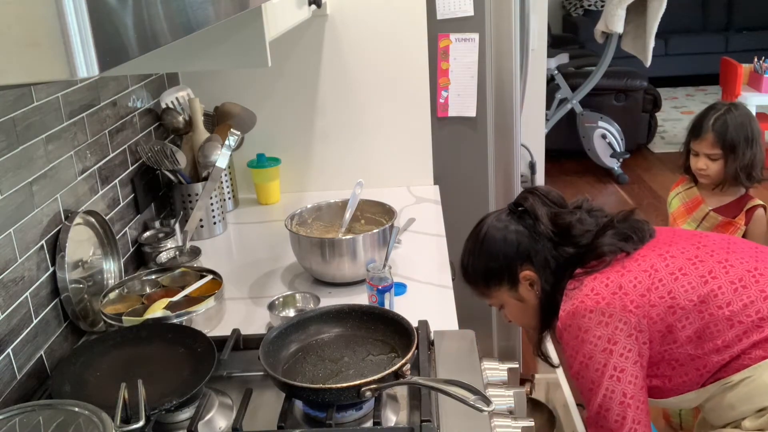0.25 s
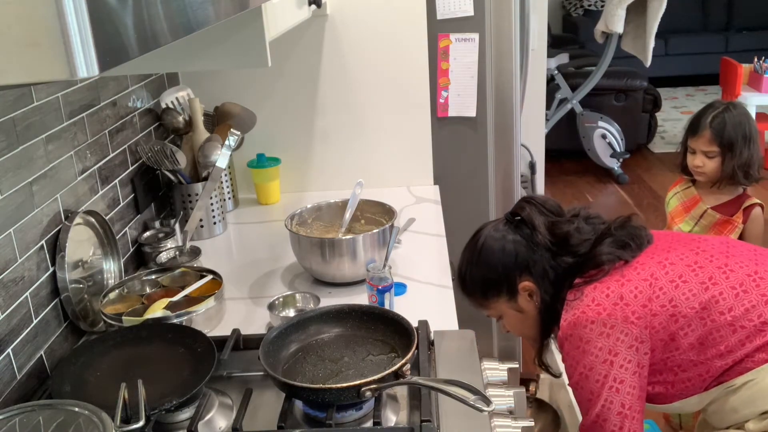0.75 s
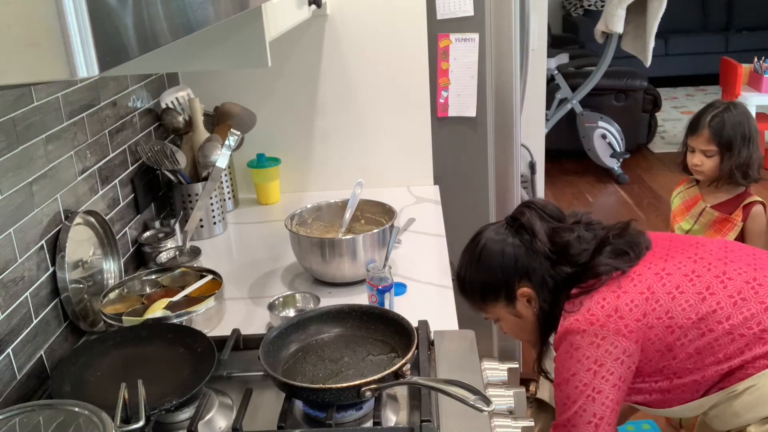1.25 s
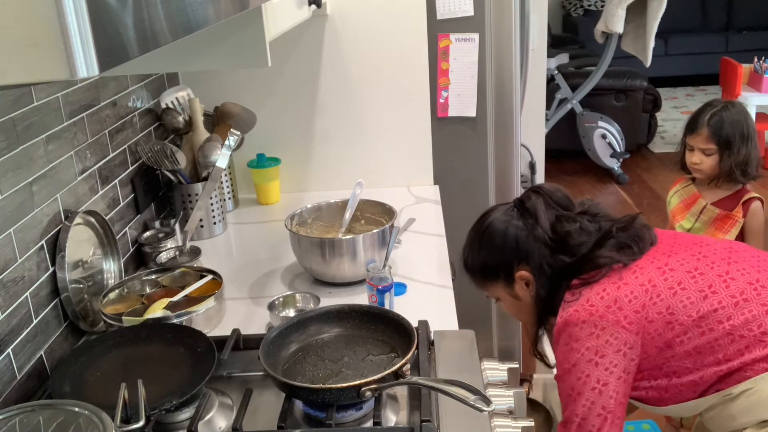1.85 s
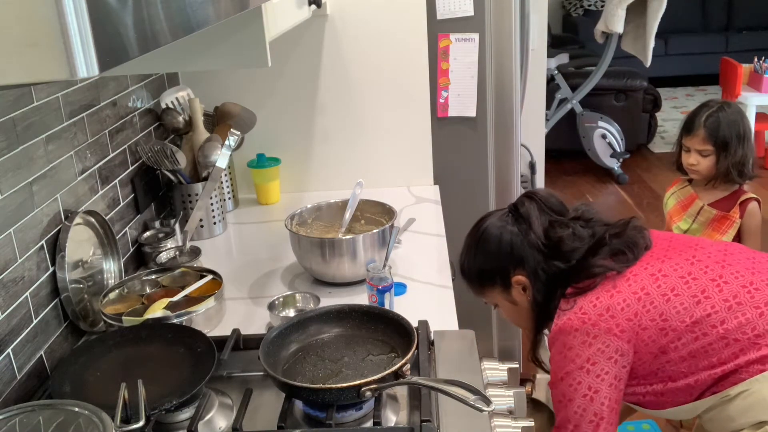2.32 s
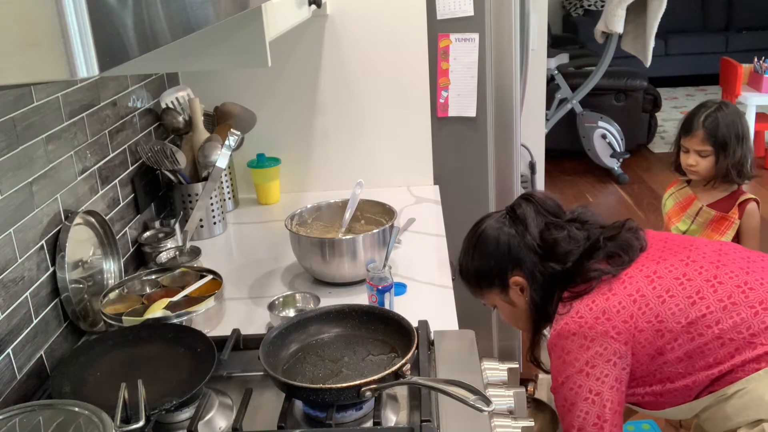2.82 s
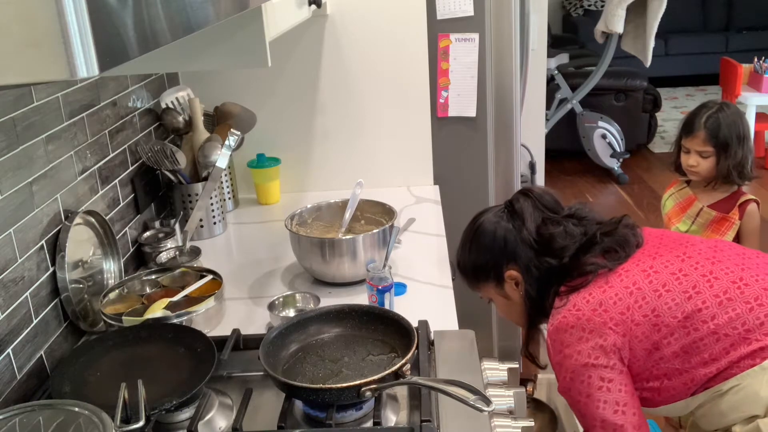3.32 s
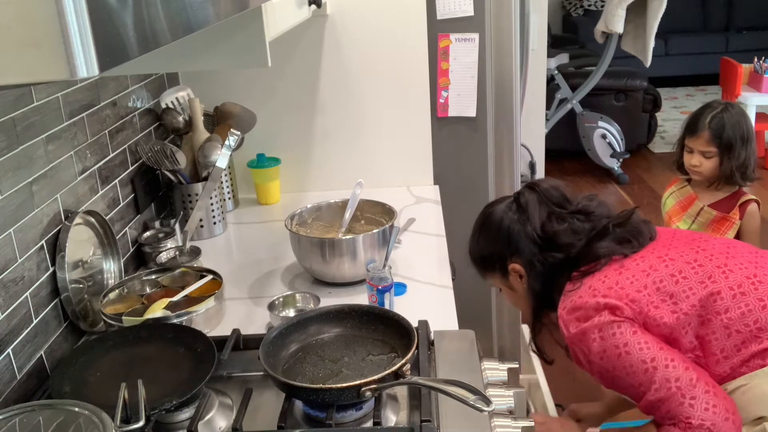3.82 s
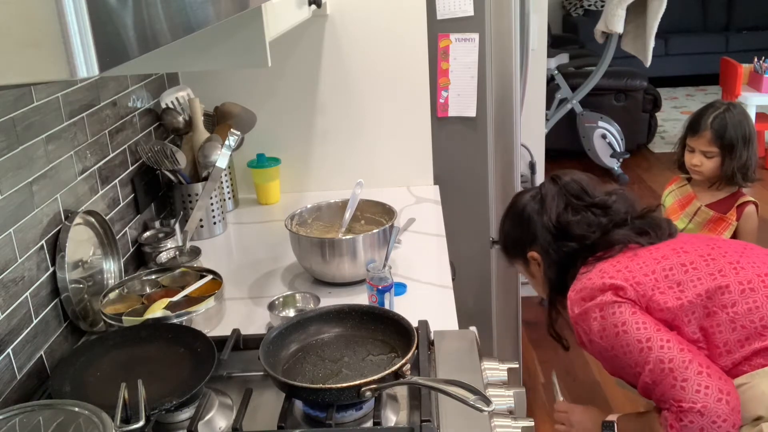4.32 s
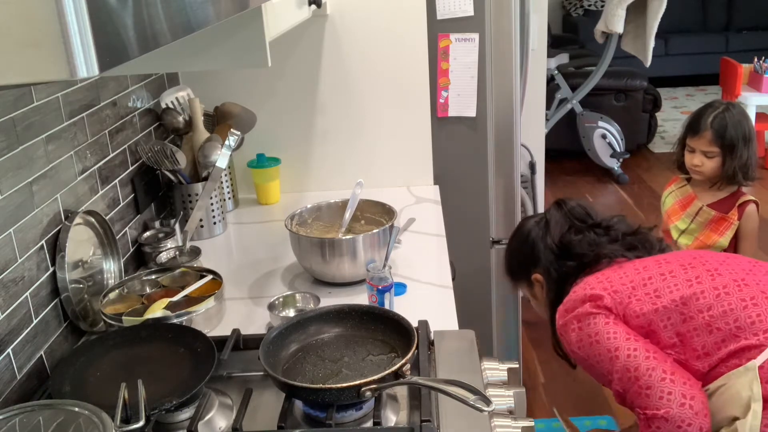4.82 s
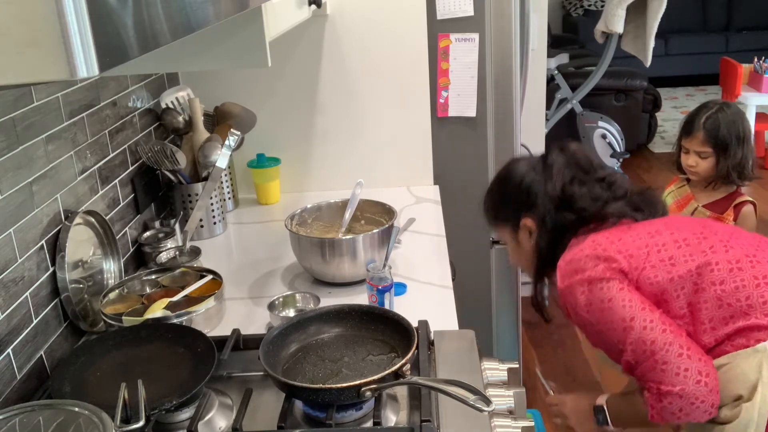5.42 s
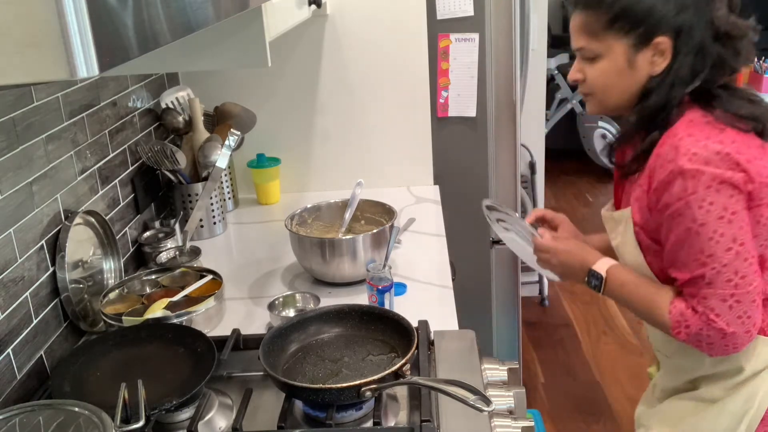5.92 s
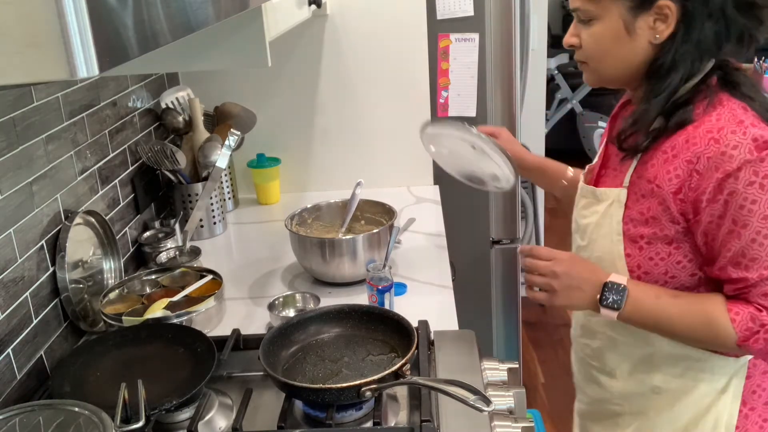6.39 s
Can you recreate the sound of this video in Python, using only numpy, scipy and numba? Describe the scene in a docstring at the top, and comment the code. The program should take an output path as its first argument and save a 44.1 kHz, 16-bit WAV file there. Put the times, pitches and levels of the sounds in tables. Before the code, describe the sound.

A low kitchen drawer bumps open with dull wooden knocks. Steel pans and lids clank, scrape and rattle as someone rummages, the heavier knocks booming in the drawer. After a short lull it rolls in with a judder and slams shut. A glass lid ticks and clothes rustle faintly. A fridge hums quietly in the hard, echoing room, heard from across the counter.

```python
"""Steel pans and lids clank, scrape and rattle as a low drawer is rummaged through in a tiled kitchen.
Each knock rings the modes of the metal and booms in the wooden drawer box. The drawer bumps open,
later rolls in with a stick-slip judder and slams; a glass lid ticks and the floor thuds softly.
A fridge hums and clothes rustle in the hard, echoing room, heard from across the counter."""
import sys
import numpy as np
from scipy import signal
from scipy.fft import rfft, irfft, next_fast_len
from scipy.io import wavfile
from scipy.ndimage import uniform_filter1d
from numba import njit

SR = 44100
rng = np.random.default_rng(int(sys.argv[2]) if len(sys.argv) > 2 else 0)


def log_audio(samples):
    """Write samples as a 16-bit WAV file to the path given in sys.argv[1]."""
    # one column per channel
    frames = np.atleast_2d(samples).T
    # limit to full scale, then quantise
    limited = np.clip(frames, -1, 1)
    pcm = np.round(limited * 32767).astype(np.int16)
    wavfile.write(sys.argv[1], SR, pcm)


N = 293441
T = np.arange(N) / SR

# modes of the pans, lids, drawer box and front panel: (frequency [Hz], level [dB], t60 [s])
PAN_MODES = [(657.5, 2, 0.038), (772, -2.5, 0.1), (845, 1.5, 0.075), (913, 0, 0.11), (990, -8, 0.014),
             (1096, -3.5, 0.05), (1168, -1, 0.088), (1277, -4, 0.11), (1390, -2, 0.066)]
LID_MODES = [(1500, -2, 0.099), (1575, -1.5, 0.11), (1685, -9.5, 0.27), (1779, -5, 0.053), (1833, 0.5, 0.1),
             (1921, -7, 0.076), (1996, 0, 0.072), (2090, -3.5, 0.11), (2340, -14, 0.027),
             (2512, -8.5, 0.13)]
BOX_MODES = [(175.6, -3, 0.09), (215.3, 2, 0.13), (247.3, 0.5, 0.15), (290.4, 0.5, 0.13), (333.2, 0, 0.11),
             (366, 0, 0.11), (468.4, 4, 0.071), (541, -1.5, 0.14), (613, -3, 0.078), (910, -22.5, .04)]
PANEL_MODES = [(360, 1, 0.044), (461, -1.5, 0.043), (528, -1.5, 0.04), (614.4, -4.5, 0.035),
               (687, -2, 0.06), (774, -5.5, 0.032), (845, -2, .035), (964, -3, 0.024), (1080, -1.5, 0.021),
               (1220, -1, 0.034), (1395, -3, 0.012), (1710, -2, 0.02), (2300, -14, 0.0075)]
# noise colour of steel meeting steel: (frequency [Hz], level [dB])
STEEL_SPECTRUM = [(530, -15), (900, -10), (1600, -6), (2900, -13.5), (5000, -13), (8000, -19), (11500, -20),
                  (15500, -24)]
# force on the drawer as it is nudged, rolled in and slammed: (time [s], level [dB])
PUSH_FORCE = [(3.94, -58), (4.04, -49), (4.52, -51), (4.58, -40), (4.74, -38.5), (4.8, -30), (4.89, -39),
              (4.93, -17), (4.98, -10.5), (5.07, -9), (5.13, -13), (5.27, -32.5), (5.5, -52)]


def pan_knocks():
    """Pans, lids and rims ring, each blow favouring its own pitch; the drawer box booms under them."""
    # (time [s], box [dB], pan [dB], lid [dB], crack [dB], rim [dB],
    #  box pitch [Hz], pan pitch [Hz], lid pitch [Hz], rim pitch [Hz])
    hits = [(1.059, -54, -61.5, -43, -60.5, -80, 352, 880, 2030, 2970),
            (1.16, -36, -31, -44.5, -45, -46, 316, 910, 2090, 3800),
            (1.203, -53, -32, -56, -70, -56, 328, 770, 2070, 3800),
            (1.225, -40.5, -32.5, -31.5, -42, -37, 186, 720, 1790, 3780),
            (1.34, -35.5, -16, -33, -31.5, -30.5, 464, 858, 1850, 7500),
            (1.36, -21.5, -18, -19.5, -31.5, -30.5, 470, 825, 1860, 6600),
            (1.41, -21.5, -15.5, -15.5, -28, -27, 473, 1180, 1890, 4200),
            (1.439, -19.5, -18.5, -20, -22.5, -23, 470, 1290, 1840, 5900),
            (1.465, -30.5, -28, -22, -34, -25.5, 180, 1200, 2000, 8300),
            (1.594, -25.5, -15.5, -28.5, -35, -26, 357, 650, 1580, 6740),
            (1.625, -24, -32, -19, -50, -42, 213, 1170, 1945, 5010),
            (1.66, -23, -19.5, -15.5, -22.5, -20.5, 336, 852, 2103, 7340),
            (1.682, -5, -21, -16, -36, -26.5, 350.5, 650, 1946, 8290),
            (1.694, -6.5, -36, -40.5, -62, -39.5, 230.4, 770, 1990, 3800),
            (1.719, -8, -29, -24, -50, -37, 181, 770, 1870, 6560),
            (1.745, -19, -38, -24.5, -50, -39.5, 308, 1176, 1900, 5990),
            (1.759, -12.5, -39.5, -16.5, -34, -25, 284, 790, 1950, 6080),
            (1.79, -22, -36, -30, -52, -42.5, 300, 900, 2520, 3150),
            (1.814, -14, -30, -34.5, -36, -30, 206.6, 900, 2510, 6630),
            (1.849, -36.5, -41, -20.5, -28.5, -24, 260, 1410, 2520, 8330),
            (2.034, -29.5, -25.5, -32, -39, -29, 276, 840, 2020, 5330),
            (2.04, -52.5, -50.5, -51.5, -60, -36.5, 270, 858, 2020, 6150),
            (2.114, -29.5, -50.5, -60, -77, -47, 219.6, 890, 2520, 3150),
            (2.219, -32, -20.5, -17, -26, -26.5, 350, 850, 1730, 7780),
            (2.27, -26, -25.5, -26, -59, -32.5, 235, 863, 1760, 3070),
            (2.319, -38.5, -33.5, -27, -41, -35, 334, 890, 2100, 3780),
            (2.42, -31, -30, -36, -42.5, -44, 359, 890, 1880, 5070),
            (2.555, -38, -24.5, -30.5, -41, -36, 367, 968, 1920, 7160),
            (2.836, -36, -29.5, -26.5, -38.5, -30.5, 370, 1120, 1850, 4374),
            (2.898, -36.5, -31, -55, -49, -43.5, 283, 644, 1840, 5940),
            (3.069, -27.5, -17.5, -20, -38, -39, 263, 1050, 1940, 3010),
            (3.123, -32, -54, -23, -62, -50, 246, 770, 1975, 3010),
            (3.202, -32, -39, -23, -28.5, -27, 523, 900, 1690, 4190),
            (3.21, -50, -50, -40, -58, -32.5, 536, 900, 1840, 6640),
            (3.234, -23, -25, -42, -58, -42, 366, 630, 1890, 7400),
            (3.283, -26.5, -39, -45, -56, -51, 304, 806, 2050, 4190),
            (3.483, -38, -29, -30, -35, -31, 357, 881, 1840, 5370),
            (3.49, -50, -34, -35.5, -69, -42, 360, 1420, 2010, 8300),
            (3.54, -34.5, -34.5, -44, -68, -44.5, 203.5, 770, 2010, 6700),
            (3.689, -59, -57.5, -68, -62, -54, 252, 775, 2010, 5230)]
    s, box_db, pan_db, lid_db, crack_db, rim_db, box_hz, pan_hz, lid_hz, rim_hz = np.transpose(hits)
    at = ((s + 0.00297) * SR).astype(int)  # the box answers the main blow, just after the first touch
    box = strike(BOX_MODES[:8], at, undb(box_db - 3.5), 3.4, 0.0017, same_spot=True, pitch=box_hz)
    pans = blows(PAN_MODES, s, pan_db - 6.5, 0.015, 3.6, 0.00028, pitch=pan_hz)
    lids = blows(LID_MODES, s, lid_db - 3.5, 0.014, 2.4, 0.0001, pitch=lid_hz)
    # bright ring of the rims: (frequency [Hz], level [dB], t60 [s])
    rim_modes = [(2820, -1.5, 0.09), (3010, 1.5, 0.048), (3156, -5, 0.055), (3454, -0.5, .06),
                 (3794, -0.5, .06), (4170, -5.5, 0.073), (4350, -9, .1), (5160, -8, .06), (5260, -6, 0.052),
                 (5980, -3.5, .06), (6150, -1.5, 0.076), (6640, -1.5, .06), (6740, -2, 0.073),
                 (7300, -1.5, 0.075), (7530, -1, .07), (8100, -4.5, 0.047), (8250, 1, 0.065),
                 (8400, -4.5, 0.044)]
    rims = blows(rim_modes, s, rim_db - 4.5, 0.012, 4.8, 0.0001, pitch=rim_hz)
    crack = cracks(STEEL_SPECTRUM, s, crack_db + 11, rise_s=0.003, fall_s=0.0071)
    return box + pans + lids + rims + crack


def rummaging(open_s=1.0):
    """The hand pulls the drawer, then shifts the pile: small taps, box rumble and a grainy scrape."""
    # (start [s], length [s], rattle [dB], rumble [dB], scrape [dB])
    hand_moves = [(-.05, 0.15, -48, -33, -43), (0.15, 0.096, -39.5, -54.5, -66),
                  (0.46, 0.068, -32.5, -36.5, -40), (1.1, 0.24, -52, -46, -65),
                  (1.34, 0.06, -12.5, -40, -37), (1.46, 0.16, -18, -33.5, -42.5),
                  (1.62, 0.059, -22, -29.5, -30), (1.8, 0.17, -23, -36, -55.5), (2.24, 0.29, -24, -40, -52),
                  (2.86, 0.32, -33.5, -38.5, -64), (3.08, 0.19, -34.5, -43, -49),
                  (3.5, 0.092, -53, -57.5, -59)]
    rattle, rumble, scrape = swells(hand_moves, attack_s=0.012, release_db_per_s=82)
    at, size = taps(per_s=300, spread_db=3)
    force = size * rattle[at]
    opened = at > open_s * SR  # until then the panel rattles instead of the pans
    pans = strike(PAN_MODES + LID_MODES, at[opened], force[opened] * undb(-31.5), 3.5, 0.0001)
    panel = strike(PANEL_MODES, at[~opened], force[~opened] * undb(-14), 5.8, 0.0002)
    at, size = taps(per_s=60, spread_db=0.88)
    box = strike(BOX_MODES, at, size * rumble[at] * undb(-15.5), 6.5, 0.0009)
    at, size = taps(per_s=590, spread_db=6.7)
    catches = np.zeros(N)
    catches[at] = size
    grain = unit(0.022 + signal.fftconvolve(catches, np.exp(-T[:SR // 50] / 0.00084))[:N])
    return pans + panel + box + undb(-0.5) * scrape * grain * coloured(STEEL_SPECTRUM)


def drawer_bumps():
    """Dull wooden knocks in the drawer's box and front panel, as it moves or pans land in it."""
    # (time [s], box [dB], panel [dB], crack [dB], box pitch [Hz], panel pitch [Hz])
    hits = [(0.05, -39.5, -25, -41, 295, 557), (0.144, -30, -17, -38.5, 253, 436),
            (0.173, -23, -27.5, -66.5, 210, 1200), (0.362, -36.5, -33, -53, 216, 446),
            (0.426, -35, -33.5, -42.5, 338, 520), (0.463, -35, -30, -39, 335, 960),
            (0.474, -17.5, -14, -31, 372, 810), (0.486, -19.5, -21.5, -30, 366, 865),
            (0.5, -15.5, -16, -28, 370, 510), (0.519, -21.5, -17, -52, 200, 690),
            (1.059, -70.5, -41, -72, 300, 1750), (1.681, -9.5, -4, -45, 355, 612),
            (4.516, -52, -45.5, -70, 300, 524), (4.578, -41, -35.5, -52.5, 296, 610),
            (4.951, -13, -26.5, -55, 307, 600), (5.115, -6, -12.5, -51, 366, 536),
            (5.842, -48, -53, -65, 247, 1098), (6.098, -47, -66, -66, 270, 780),
            (6.298, -48, -59.5, -68, 270, 778)]
    # colour of the crack: (frequency [Hz], level [dB])
    wood_spectrum = [(530, -32.5), (900, -4), (2000, -6), (4200, -7), (8000, -14.5), (11500, -17.5),
                     (15500, -19.5)]
    s, box_db, panel_db, crack_db, box_hz, panel_hz = np.transpose(hits)
    box = blows(BOX_MODES[:6], s, box_db - 6, 0.01533, 2.0, 0.0027, pitch=box_hz)
    panel = blows(PANEL_MODES, s, panel_db + 0.76, 0.016, 2.1, 0.00035, pitch=panel_hz)
    return box + panel + cracks(wood_spectrum, s, crack_db + 13, rise_s=0.0036, fall_s=0.009)


def drawer_closing(judder_hz=42.25, jitter=0.1, slam_s=5.115):
    """The drawer sticks and slips: near-even pulses shake box and cabinet; it slams with a boom."""
    # (frequency [Hz], level [dB], t60 [s])
    cabinet_modes = [(73.3, -6, 0.078), (87.6, 0, 0.13), (109.5, -8.5, 0.39)]
    chance = rng.standard_normal((80, 2))
    gaps = SR / judder_hz * (1 + jitter * chance[:, 0])
    at = np.cumsum(gaps).astype(int) + int(PUSH_FORCE[0][0] * SR)
    force = undb(1.5 * chance[:, 1]) * envelope(PUSH_FORCE)[at]
    box = strike(BOX_MODES, at, force * undb(-5.5), 2.7, 0.0022, same_spot=True)
    cabinet = strike(cabinet_modes, at, force * undb(-13.5), 2.3, 0.0035, same_spot=True)
    boom = strike(cabinet_modes, np.array([int(slam_s * SR)]), undb([-20.5]), 1.3, 0.0056, same_spot=True)
    # colour of the slam's crack: (frequency [Hz], level [dB])
    slam_spectrum = [(500, -18), (1000, 9), (1800, -3.5), (3000, -12), (6000, -24.5), (11500, -29),
                     (15500, -33)]
    crack = cracks(slam_spectrum, np.array([slam_s]), db=-22, rise_s=0.001, fall_s=0.024)
    return box + cabinet + boom + crack


def rollers():
    """The rollers rumble through box and panel, and the runners hiss as the drawer rolls in."""
    at, size = taps(per_s=300, spread_db=0.8)
    force = size * envelope(PUSH_FORCE)[at]
    box = strike(BOX_MODES[:6], at, force * undb(-19), 4.6, 0.0021)
    panel = strike(PANEL_MODES, at, force * undb(-23), 5.5, 0.0012)
    # colour of the hiss: (frequency [Hz], level [dB])
    runner_spectrum = [(350, -60), (600, 4), (1500, 7.5), (2700, 1.5), (3800, 4.5), (5500, -6), (8000, -10),
                       (11500, -22.5), (15500, -17)]
    hiss, = swells([(4.62, 0.53, -43.5)], attack_s=0.14, release_db_per_s=193)
    return box + panel + hiss * coloured(runner_spectrum)


def glass_clink():
    """A knob ticks on the glass lid, which rings briefly."""
    # (time [s], level [dB])
    touches = [(5.692, -55), (5.704, -35.5), (5.712, -38)]
    # (frequency [Hz], level [dB], t60 [s])
    glass_modes = [(1990, -13, .12), (2930, -2, .025), (3160, 1, 0.042), (3300, -2, .03), (3790, -3, .025),
                   (4160, 1, .03), (4716, -8, .025), (6000, -9, .03), (7750, -6, .02), (8100, -3, .02)]
    # (frequency [Hz], level [dB])
    tick_spectrum = [(900, -49), (2300, -43), (3100, 4), (8000, -10), (11500, -22), (15500, -21)]
    s, db = np.transpose(touches)
    glass = blows(glass_modes, s, db - 7, 0.0027, 2.6, 0.0001, count=2)
    return glass + cracks(tick_spectrum, s, db + 2, rise_s=0.0011, fall_s=0.0024)


def low_thuds():
    """Soft, deep thuds in the floor, some under the heavier knocks."""
    # (time [s], level [dB])
    thuds = [(1.418, -34), (1.685, -28.5), (3.089, -26.5), (3.248, -34), (4.608, -38), (5.329, -28.5),
             (6.302, -36)]
    # (frequency [Hz], level [dB], t60 [s])
    floor_modes = [(55, -9, 0.088), (94, 2.5, 0.055), (138, -6.5, 0.052)]
    s, db = np.transpose(thuds)
    return strike(floor_modes, (s * SR).astype(int), undb(db - 1), 1.5, 0.0034, same_spot=True)


def clothes():
    """Cloth rustles as the cook straightens up: bright, fluttering noise."""
    # (time [s], level [dB])
    rustle = [(5.4, -84), (5.684, -75), (6.006, -73.5), (6.336, -68.5), (6.53, -69.5), (6.65, -82)]
    # (frequency [Hz], level [dB])
    cloth_spectrum = [(500, -29.5), (1500, 0.5), (4000, 2), (8000, 2.5), (15500, -4.5)]
    flutter = undb(4.1 * waver(22.8))
    return envelope(rustle) * flutter * stereo(coloured(cloth_spectrum), coloured(cloth_spectrum))


def fridge():
    """The fridge hums in low tones, each wavering in level."""
    # (frequency [Hz], level [dB])
    tones = [(53.5, -57), (147, -74), (269.5, -63), (371, -71)]
    return sum(np.sqrt(2) * undb(db + 2 * waver(9.5)) * np.sin(2 * np.pi * hz * T) for hz, db in tones)


def room_tone(level_db=-57.5):
    """A faint, dark hush that slowly swells and sinks."""
    # (frequency [Hz], level [dB])
    air = [(15, -42), (25, -19), (59, 2.5), (190, -9.5), (270, -1.5), (317, -14), (373, -2.5),
           (476, -12.5), (820, -15.5), (2500, -30.5), (8000, -43.5), (15500, -56)]
    return unit(stereo(coloured(air), coloured(air))) * undb(level_db + 1.5 * waver(3))


def kitchen_echo(x, hop_s=0.22):
    """Octave bands die at their own rates; the echo is redrawn in overlapping slices for a smooth tail."""
    # reverb tail: (frequency [Hz], t60 [s], level [dB])
    tail = [(59, 0.3, 7.5), (263, 0.69, -5.5), (720, 0.49, 0.5), (1800, 0.78, -0.5), (4740, 0.66, 3),
            (12600, 0.26, 6.5)]
    n, hop = SR, int(hop_s * SR)
    noise = rfft(stereo(rng.standard_normal(n), rng.standard_normal(n)))
    octave = np.log2(np.maximum(np.fft.rfftfreq(n, 1 / SR), 1))
    centres = 2. ** np.arange(5, 15)
    bands = irfft(noise * np.clip(1 - abs(octave - np.log2(centres)[:, None, None]), 0, 1), n)
    decay = undb(on_log(tail, centres, column=2)[:, None] - 60 * T[:n] / on_log(tail, centres)[:, None])
    decay = decay * (1 - np.exp(-T[:n] / 0.00071)) / np.sqrt(SR)
    x, out = np.pad(x, (hop, 2 * hop)), np.zeros((2, N + 3 * hop + n))
    fade = np.sin(np.pi * np.arange(2 * hop) / (2 * hop))
    for i in range(0, N + hop, hop):
        echo = np.einsum("bcn,bn->cn", np.roll(bands, rng.integers(n), axis=2), decay)
        piece = x[i:i + 2 * hop] * fade
        out[:, i:i + 2 * hop + n - 1] += signal.fftconvolve(piece[None], echo, axes=1)
    return out[:, hop:hop + N]


def blows(modes, s, db, chatter_s, scatter_db, push_s, count=4, pitch=None):
    """Each blow is a quick flurry of contacts: a light first touch, the blow itself, then bounces."""
    touch, bounce = 0.46, 0.48  # shares of the blow
    late = np.c_[np.zeros(len(s)), np.full(len(s), .2), .3 + .7 * rng.random((len(s), count - 2))]
    size = undb(db)[:, None] * np.r_[touch, 1, np.full(count - 2, bounce)] / np.sqrt(2)
    at = ((s[:, None] + chatter_s * late) * SR).astype(int)
    return strike(modes, at.ravel(), size.ravel(), scatter_db, push_s, count=count, pitch=pitch)


def strike(modes, at, size, scatter_db, push_s, same_spot=False, count=1, pitch=None):
    """Each run of `count` contacts rings its own mix of modes; `same_spot` holds their polarities."""
    focus_db, focus_octaves = 12.5, 0.092  # how strongly and narrowly a blow favours modes near `pitch`
    detune = 0.004  # share by which the shifting pile pulls a 1 kHz mode off pitch
    hz, db, t60 = np.transpose(modes)
    shape = (len(at) // count, len(modes))
    mix_db = scatter_db * np.sqrt(3) * rng.uniform(-1.24, 1, shape)
    if pitch is not None:
        mix_db += focus_db * (np.exp(-(np.log2(hz / pitch[:, None]) / focus_octaves) ** 2) - .5)
    mix_db = np.repeat(mix_db, count, axis=0)
    pull = 1 + detune * np.sqrt(hz / 1e3) * rng.standard_normal(shape)
    pulled_hz = hz * np.repeat(pull, count, axis=0)
    sign = (-1.) ** np.arange(len(hz)) if same_spot else np.sign(rng.standard_normal(mix_db.shape))
    force = size[:, None] * sign * undb(db + mix_db)
    poles = np.exp((2j * np.pi * pulled_hz - np.log(1000) / t60) / SR)
    order = np.argsort(at)
    ringing = ring(N, at[order], force[order], poles[order])
    # a softer contact pushes longer; everything below the lowest mode is cut away
    push = np.hanning(max(int(push_s * SR), 3))
    softened = np.convolve(ringing, push / push.sum())[:N]
    return signal.sosfilt(signal.butter(3, 0.53 * hz[0], "high", fs=SR, output="sos"), softened)


@njit
def ring(n, at, force, poles):
    """Sum of decaying modes, each kicked at the sorted samples `at` and resting once it has died away."""
    y = np.zeros(n)
    for mode in range(poles.shape[1]):
        z = 0j
        for hit in range(len(at)):
            z += force[hit, mode]
            for i in range(at[hit], at[hit + 1] if hit + 1 < len(at) else n):
                y[i] += z.imag
                z *= poles[hit, mode]
                if abs(z.real) + abs(z.imag) < 1e-6:
                    break
    return y


def cracks(spectrum, s, db, rise_s, fall_s):
    """Short noise bursts of surfaces meeting."""
    impulses, t = np.zeros(N), T[:SR // 8]
    impulses[(s * SR).astype(int)] = undb(db)
    burst = (1 - np.exp(-t / rise_s)) * np.exp(-t / fall_s)
    return signal.fftconvolve(impulses, burst)[:N] * coloured(spectrum)


def taps(per_s, spread_db):
    """Random instants and sizes: many small taps, a few larger."""
    chance = rng.random((int(per_s * N / SR), 2))
    at = (chance[:, 0] * (N - 1)).astype(int)
    return at, unit(undb(-spread_db * np.log(1 - .95 * chance[:, 1])))


def swells(rows, attack_s, release_db_per_s):
    """Gain curves, one per dB column: each row rises, holds to the end of its length, then dies away."""
    out = 0
    for start, length, *db in rows:
        attack = np.clip((T - start) / attack_s, 0, 1)
        release = undb(-release_db_per_s * np.maximum(T - start - length, 0))
        out = out + undb(db)[:, None] * attack * release
    return out


def envelope(points, fade_s=0.02):
    """Gain curve through (time [s], level [dB]) points, fading to silence outside them."""
    s, db = np.transpose(points)
    fade = np.clip(np.minimum(T - s[0] + fade_s, s[-1] + fade_s - T) / fade_s, 0, 1)
    return fade * undb(np.interp(T, s, db))


def waver(rate_hz):
    """Smooth random drift of rms 1."""
    width = int(SR / rate_hz)
    return unit(uniform_filter1d(uniform_filter1d(rng.standard_normal(N), width), width))


def coloured(spectrum):
    """Noise of rms 1 with the given spectrum."""
    size = next_fast_len(N, True)
    hz = np.fft.rfftfreq(size, 1 / SR)
    return unit(irfft(rfft(rng.standard_normal(size)) * undb(on_log(spectrum, hz)), size)[:N])


def stereo(a, b):
    """Left and right from two noises: narrow in the bass and at the very top, wide in between."""
    # (frequency [Hz], left-right correlation [0-1])
    likeness = [(60, 0.97), (290, 0.93), (640, 0.064), (1400, 0.035), (5000, 0.078), (9000, 0.083),
                (16000, 1)]
    size = next_fast_len(len(a), True)
    alike = np.clip(on_log(likeness, np.fft.rfftfreq(size, 1 / SR)), 0, 1)
    mid, side = rfft(a, size) * np.sqrt((1 + alike) / 2), rfft(b, size) * np.sqrt((1 - alike) / 2)
    return irfft(np.array([mid + side, mid - side]), size)[:, :len(a)]


def on_log(table, hz, column=1):
    """Read one column of a table on a log-frequency axis."""
    table = np.asarray(table)
    return np.interp(np.log(np.maximum(hz, 1)), np.log(table[:, 0]), table[:, column])


def undb(db):
    """Decibels to gain."""
    return 10 ** (np.asarray(db) / 20)


def unit(x):
    """Scale to rms 1."""
    return x / np.sqrt(np.mean(x ** 2))


def scene():
    """Direct sound and kitchen echo over the quiet background, in stereo."""
    solid = drawer_closing() + rollers() + low_thuds()  # these also carry through the counter
    direct = pan_knocks() + drawer_bumps() + glass_clink() + rummaging() + solid
    left, right = undb(-2) * direct + undb(-8.5) * solid + undb(14) * kitchen_echo(direct)
    left = np.roll(left, 4)  # the drawer lies to the right, so the left side hears it a little later
    return np.array([left, right]) + room_tone() + fridge() + clothes()


def record(dry):
    """The left side is a little bassier; the deepest bass is cut, peaks are rounded, the top is cut."""
    bass = signal.sosfilt(signal.butter(1, 450, fs=SR, output="sos"), dry)
    tilted = dry + bass * np.array([[.2], [-.2]])
    trimmed = signal.sosfilt(signal.butter(3, 50., "high", fs=SR, output="sos"), tilted)
    rounded = np.tanh(.8 * trimmed) / .8
    return signal.sosfilt(signal.ellip(10, .2, 80, 16300, fs=SR, output="sos"), rounded)


dry = scene()
out = record(dry)
log_audio(out)
```